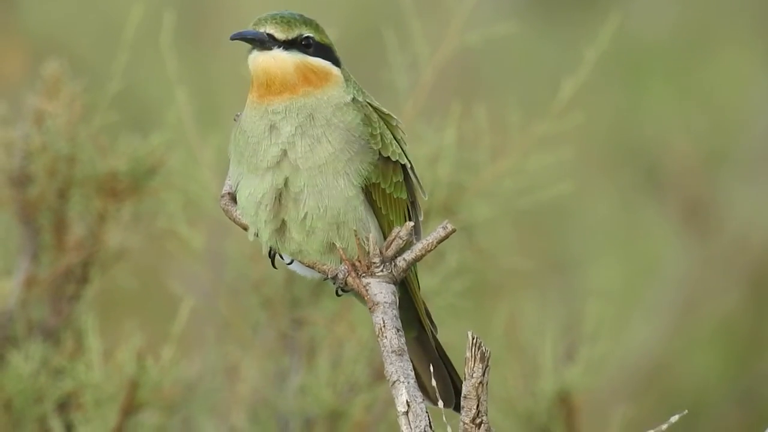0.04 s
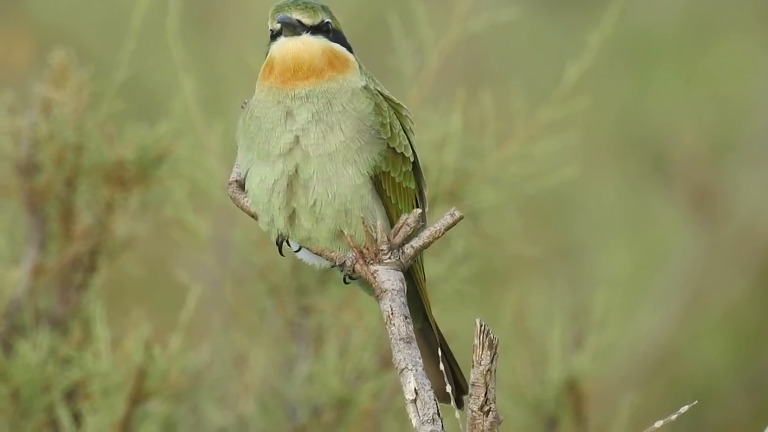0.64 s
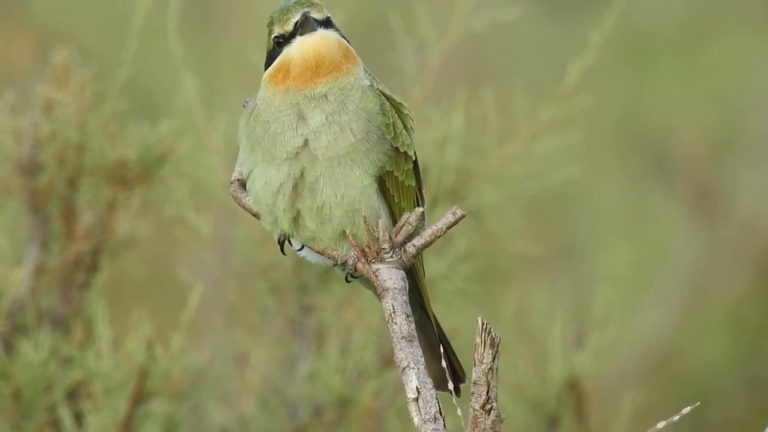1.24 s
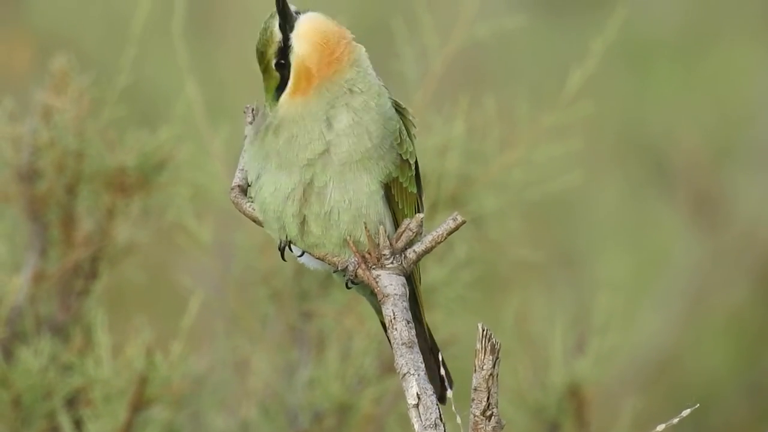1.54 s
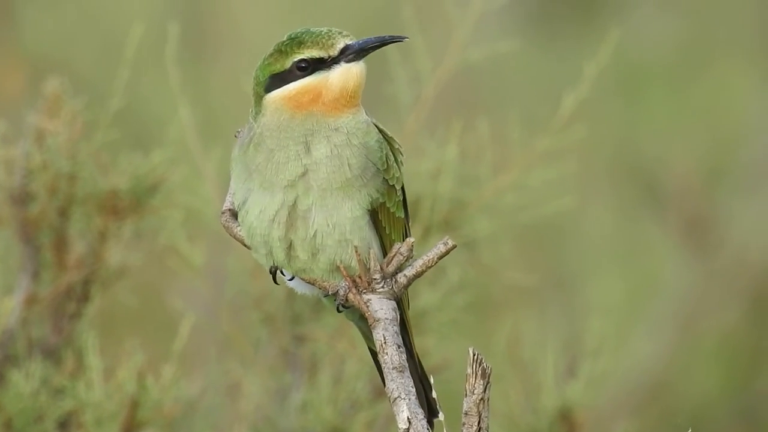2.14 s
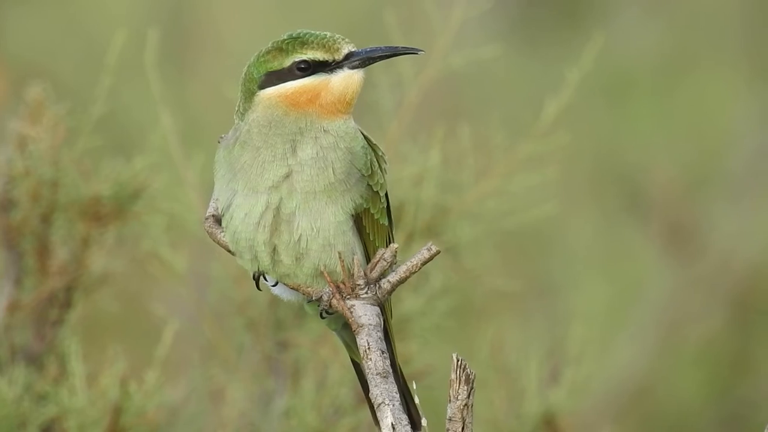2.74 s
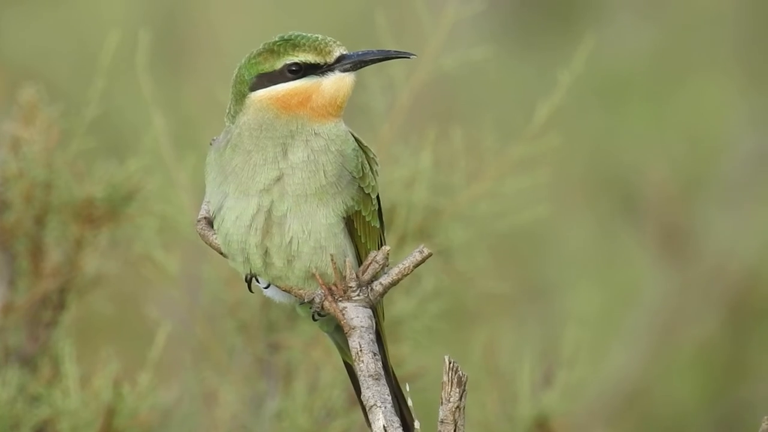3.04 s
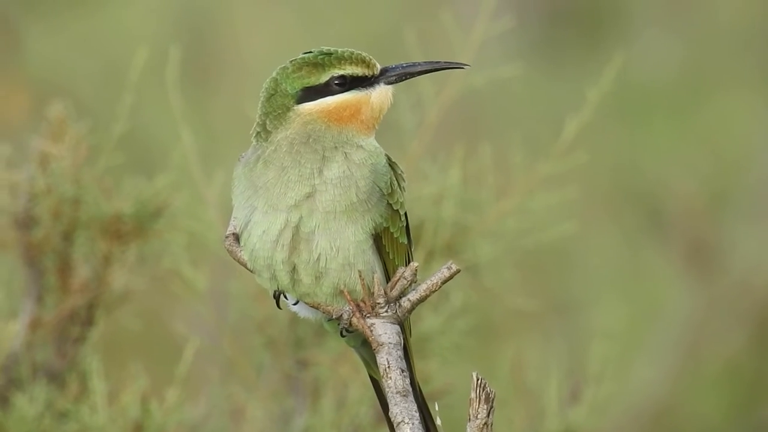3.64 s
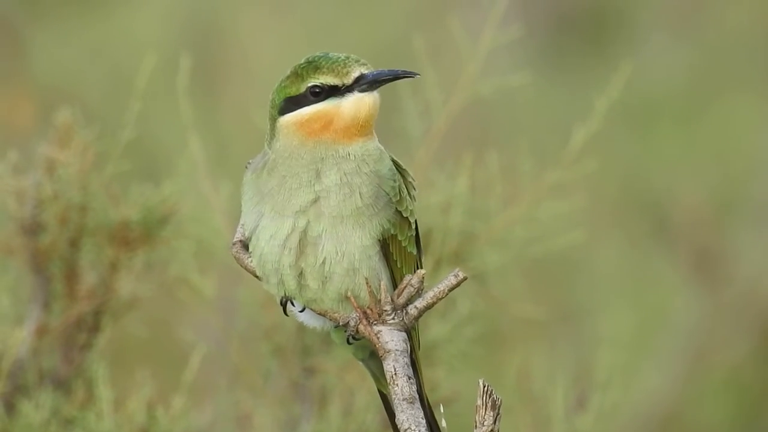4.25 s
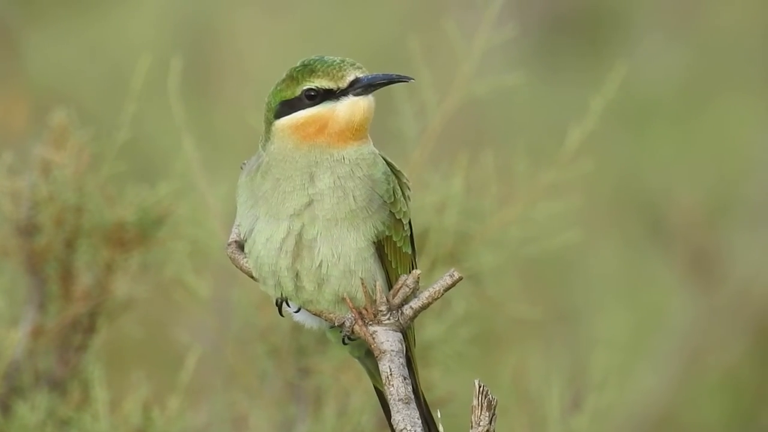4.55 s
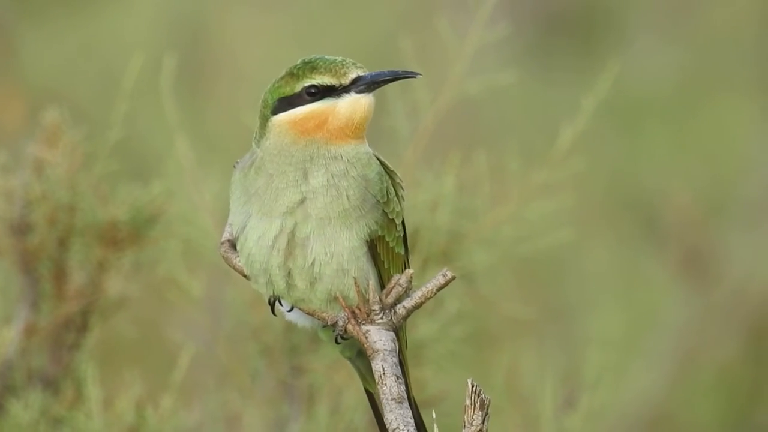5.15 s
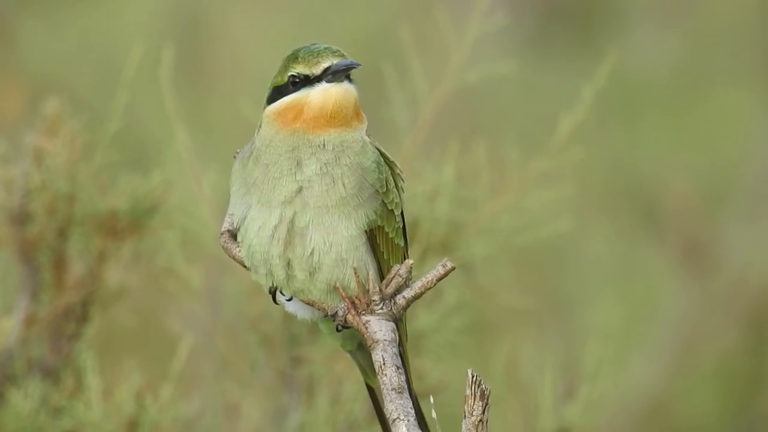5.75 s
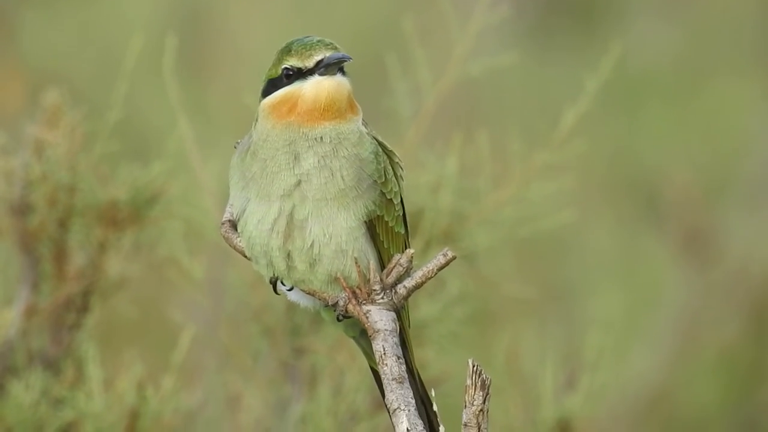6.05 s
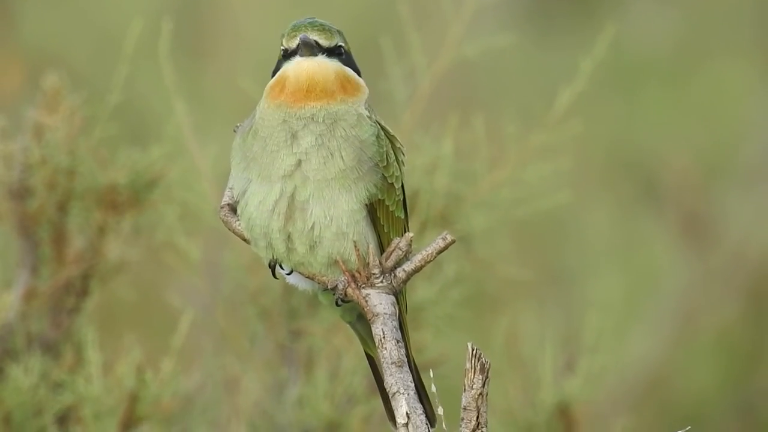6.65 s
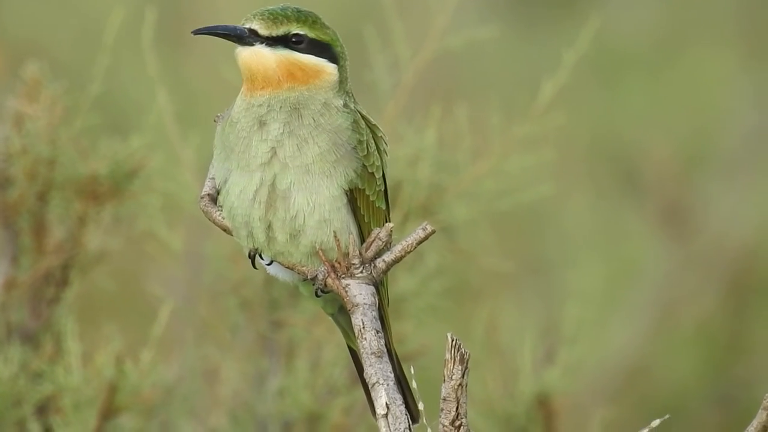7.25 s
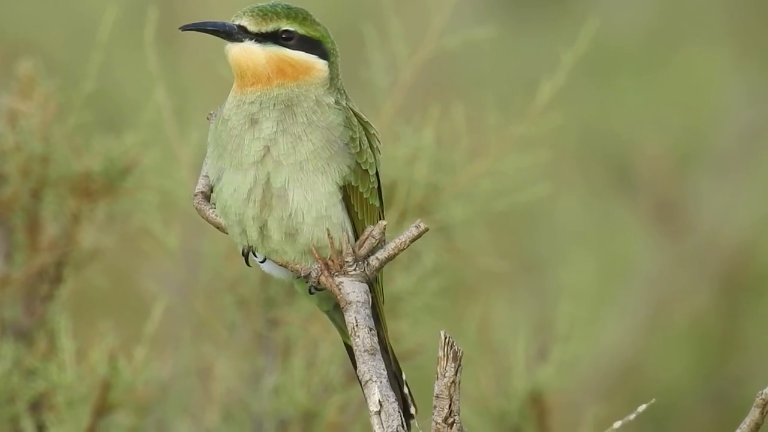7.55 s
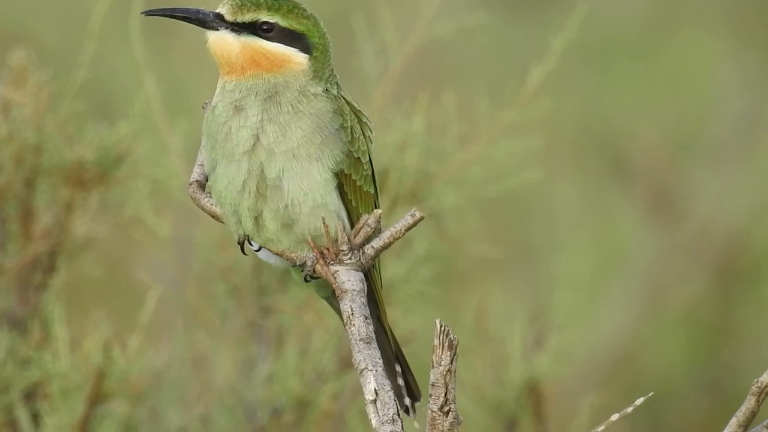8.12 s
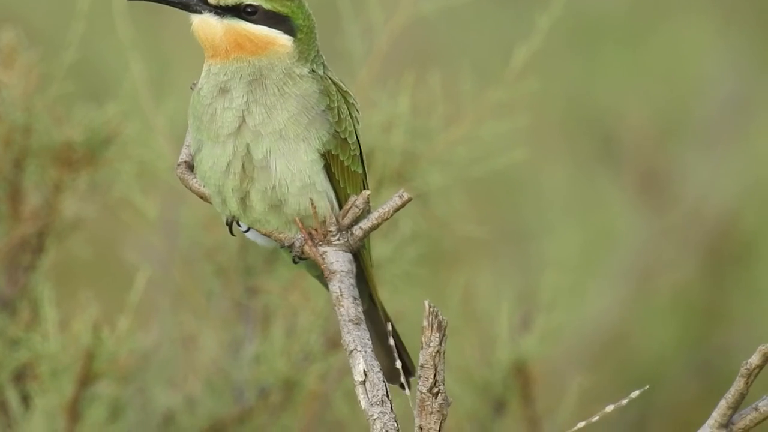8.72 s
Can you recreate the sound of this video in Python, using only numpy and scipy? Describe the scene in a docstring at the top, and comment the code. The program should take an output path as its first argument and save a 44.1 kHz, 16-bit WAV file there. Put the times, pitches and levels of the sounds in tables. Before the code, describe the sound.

Wind puffs and thumps on the microphone in open scrub while crickets chirp steadily and small birds twitter far away.

```python
"""A breeze rumbles on the two microphone ports and swells in short puffs, over the hush of open scrub.
Single eddies thump, and there are short clicks as strong wind overloads the microphone. Crickets chirp
by stridulation, drawing a scraper over a file in short groups of falling pulses near 5 kHz.
A thin buzzing trill of rapid sweeps comes and goes in bouts above them, and small birds
twitter and whistle far off in gliding tones. Ground and bushes scatter the calls into a short tail."""
import sys
import numpy as np
from scipy import signal
from scipy.fft import rfft, irfft, next_fast_len
from scipy.io import wavfile
from scipy.ndimage import uniform_filter1d

SR = 44100
rng = np.random.default_rng(int(sys.argv[2]) if len(sys.argv) > 2 else 0)


def persist_wave(psi):
    """Save psi, clipped to +-1, as 16-bit WAV."""
    counts = np.round(np.clip(psi, -1, 1) * 32767).astype(np.int16)
    wavfile.write(sys.argv[1], SR, np.atleast_2d(counts).T)


N = 387198
TIME = np.arange(N) / SR


def undb(db):
    """Amplitude ratio of a level in decibels."""
    return 10 ** (np.asarray(db) / 20)


def unit(x):
    """Normalisation to an rms of 1."""
    return x / np.sqrt(np.mean(x ** 2))


def add(out, s, sound):
    """Superposition: mix a stereo sound in at s seconds."""
    i = max(int(s * SR), 0)
    part = sound[:, :max(N - i, 0)]
    out[:, i:i + part.shape[1]] += part


def drift(rate_hz):
    """Random modulation of rms 1, interpolated between Gaussian values."""
    knots = rng.standard_normal(int(N / SR * rate_hz) + 2)
    return unit(np.interp(TIME * rate_hz, np.arange(len(knots)), knots))


def noise(spectrum, coherence):
    """Partially coherent coloured noise: coherence is the share common to both ports."""
    hz, db = np.transpose(spectrum)
    size = next_fast_len(N)
    gain = undb(np.interp(np.log(np.fft.rfftfreq(size, 1 / SR) + 1), np.log(hz), db))
    mid, side = irfft(rfft(rng.standard_normal((2, size))) * gain, size)[:, :N]
    return unit(np.sqrt(1 + coherence) * mid + np.sqrt(1 - coherence) * np.array([side, -side]))


def band(x, low_hz, high_hz):
    """Butterworth band-pass with gentle slopes."""
    return signal.sosfilt(signal.butter(2, [low_hz, high_hz], "band", fs=SR, output="sos"), x)


def glide(length_s, pitches, lead, taper, waver):
    """Frequency modulation: an arched tone passes through three pitches; left leads by lead radians."""
    u = np.linspace(0, 1, int(length_s * SR))
    start, middle, end = pitches
    hz = middle + (end - start) * (u - .5) + 2 * (start + end - 2 * middle) * (u - .5) ** 2
    hz *= 1 + waver * np.interp(u, np.linspace(0, 1, 20), rng.standard_normal(20))
    phase = 2 * np.pi * (np.cumsum(hz) / SR + rng.random())
    return np.abs(np.sin(np.pi * u)) ** taper * np.sin([phase + lead, phase])


def bout_times(start, period, repeats):
    """Periodic repetition: the times of the calls in one bout."""
    return start + period * np.arange(repeats)


# The slow breeze. Each row: time in seconds, level in dB.
BREEZE = [(0.0, -34.5), (0.3, -44.5), (0.42, -58), (0.99, -49.3), (1.04, -39), (1.48, -43.5), (2.03, -37.5),
          (2.52, -42.5), (2.69, -31.5), (3.53, -36), (3.57, -43.5), (4.03, -30.5), (4.8, -44),
          (5.23, -34.5), (5.95, -46.5), (6.48, -42), (7.35, -52.0), (8.78, -44.5)]
# Puffs on top of it. Each row: start in seconds, length in seconds, left and right level in dB.
PUFFS = [(0, 0.063, -34, -31.5), (0.118, .15, -43, -38), (0.546, 0.11, -59, -38.5), (0.62, 0.22, -40, -43),
         (0.907, .11, -33.5, -34.5), (1.27, 0.064, -58, -30.5), (1.35, 0.09, -28.5, -55),
         (1.747, 0.23, -37, -33), (2.17, .13, -36, -25.5), (2.463, .12, -39, -32.5),
         (2.773, 0.11, -29, -26.5), (2.947, 0.25, -34.5, -30), (3.342, 0.13, -31, -27.5),
         (3.69, 0.28, -29.5, -28.5), (4.468, 0.12, -37.5, -32.5), (4.599, 0.099, -44, -30.5),
         (5.046, 0.075, -29.5, -30.5), (5.447, 0.048, -46, -33.5), (5.56, .11, -39, -30),
         (5.958, .12, -35, -35), (6.43, 0.34, -38, -39), (7.067, .11, -35, -34.5),
         (7.415, 0.23, -41, -35.5), (7.626, 0.13, -35, -33.5), (7.966, 0.25, -39.5, -34.5),
         (8.25, 0.13, -37, -31), (8.433, 0.055, -39, -29), (8.65, 0.063, -52.5, -35.5)]

def gusts(windward_db=1.5):
    """Wind level in dB at each port: the powers of breeze and arched puffs add, as incoherent sources."""
    tilt_db = windward_db * np.array([[-.5], [.5]])  # the right port faces the wind
    power = undb(np.interp(TIME, *np.transpose(BREEZE)) + tilt_db) ** 2
    for s, length, *ports_db in PUFFS:
        arch = np.sin(np.linspace(0, np.pi, int(length * SR)))
        add(power, s, np.outer(undb(ports_db), arch) ** 2)
    return 10 * np.log10(power)


# Spectrum of the turbulence. Each row: frequency in Hz, relative spectral density in dB.
RUMBLE_SPECTRUM = [(20, -45), (40, -38), (62, -9.5), (85, -15), (110, -3.5), (145, 0.5), (200, -2.5),
                   (300, -12), (450, -23.5), (700, -35), (1200, -40.5), (3000, -55), (9000, -77)]

def wind(gain_db=-1, strong_db=-32, brightening=1.93, rough_db=-18, crackle_db=-27):
    """Turbulent pressure rumbles at each port; strong gusts add smaller, higher eddies and a crackle."""
    gust_db = gusts()
    force = undb(brightening * (gust_db - strong_db))  # 1 in a strong gust
    rumble = unit(noise(RUMBLE_SPECTRUM, coherence=.27) * flicker(depth_db=3, rate_hz=55))
    rough = unit(band(rng.standard_normal((2, N)), 301, 496) * flicker(depth_db=8.5, rate_hz=80))
    impulses_per_s = 16 * force
    impulses = (rng.random((2, N)) < impulses_per_s / SR) * rng.standard_normal((2, N))
    crackle = band(band(impulses, 300, 5300), 300, 5300)
    rumble *= undb(gust_db + gain_db) * flicker(depth_db=2, rate_hz=16)
    return rumble + rough * force * undb(strong_db + rough_db) + crackle * undb(crackle_db)


def flicker(depth_db, rate_hz):
    """Random amplitude modulation, independent at the two ports."""
    return undb(depth_db * np.array([drift(rate_hz), drift(rate_hz)]))


# Spectrum of the hush. Each row: frequency in Hz, relative spectral density in dB.
HUSH_SPECTRUM = [(30, 3), (150, 2), (400, 2), (1000, 1), (1300, -5.5), (1800, -4), (2100, -10.5),
                 (3700, -9), (5000, -5), (5900, -8.5), (6700, -7), (9000, -15), (15500, -24)]

def hush(db=-53, distant_db=-63, sway_db=.05):
    """Ambient noise of open land; a band common to both ports raises the midrange coherence."""
    distant = unit(band(rng.standard_normal(N), 490, 1470))
    diffuse = noise(HUSH_SPECTRUM, coherence=.14)
    return (diffuse * undb(db) + distant * undb(distant_db)) * undb(sway_db * drift(2.35))


def eddy(t, hz, phase_turns, decay_cycles):
    """A passing eddy is a pressure transient: a swing that grows and decays exponentially."""
    return np.exp(-np.abs(t * hz / decay_cycles)) * np.sin(2 * np.pi * (hz * t + phase_turns))


def flurry(gain_db=5, spread_db=6, low_hz=150, high_hz=420, count=110):
    """Local turbulence: small eddies strike the ports in turn, scaled by the wind level there."""
    out, gust_db = np.zeros((2, N)), gusts()
    t = np.arange(-SR // 16, SR // 16) / SR
    for k, (late, pitch, phase, size) in enumerate(rng.random((count, 4))):
        port, i = k % 2, int((k + late) / count * N)
        hz = low_hz * (high_hz / low_hz) ** pitch
        swing = eddy(t, hz, phase, decay_cycles=1) * undb(gust_db[port, i] + gain_db + spread_db * size)
        add(out, i / SR + t[0], np.outer(np.eye(2)[port], swing))
    return out


def twitter(db=-59.7, fade_db_per_s=.65, spread_db=4, hz=2490, spread_hz=260, count=130):
    """Short notes of the farthest birds superpose into a soft chatter that slowly dies down."""
    out = np.zeros((2, N))
    notes = np.c_[rng.random((count, 2)), rng.uniform(-1, 1, (count, 3))]
    for k, (late, length, pitch, slope, size) in enumerate(notes):
        s = (k + late) / count * N / SR
        pitches = hz + spread_hz * pitch + 150 * slope * np.array([1, 0, -1])
        note = glide(.0196 + .0383 * length, pitches, lead=.21, taper=1, waver=.02)
        add(out, s, note * undb(db - fade_db_per_s * s + spread_db * size))
    return out


def chirp(out, s, hz, spacing_s, first_db, db, lead, pulses, stroke_s=.0155, fall_hz=370, rasp=.14):
    """Stridulation: in each wing stroke the scraper slows along the file, so the tone falls."""
    for k in range(pulses):
        stroke = glide(stroke_s, hz + fall_hz * np.array([1, 0, -1]), lead, taper=1.5, waver=.012)
        # the teeth catch unevenly
        teeth = 1 + rasp * unit(uniform_filter1d(rng.standard_normal(stroke.shape), size=24))
        add(out, s + k * spacing_s - stroke_s / 2, stroke * teeth * undb(db + first_db * (k == 0)))


# Four crickets. Each row: carrier in Hz, pulse spacing in seconds, gain of the first pulse in dB,
# level in dB, phase lead of the left port in radians.
CRICKETS = [(5190, .0225, -6, -33, 1.7), (5274, .023, -1, -36, -2.5), (4790, .0215, -1.5, -43.5, 1.9),
            (5030, 0.019, 1, -41.5, 3)]
# The nearest two chirp loosely, about twice a second. Each entry: chirp time in seconds.
FIRST_CRICKET_S = [.064, .506, 1.119, 1.784, 2.312, 2.813, 3.473, 4.065, 4.55, 4.936, 5.545, 6.002, 6.52,
                   6.954, 7.66, 8.259]
SECOND_CRICKET_S = [.33, .768, 1.196, 1.512, 1.943, 2.252, 2.577, 2.969, 3.399, 3.79, 4.216, 4.657, 5.06,
                    5.459, 5.913, 6.38, 6.774, 7.196, 7.609, 7.998, 8.376, 8.556]
# The other two keep time in bouts. Each row: start in seconds, period in seconds, number of chirps.
THIRD_CRICKET_BOUTS = [(.68, .923, 2), (2.226, .535, 6), (6.645, .494, 5)]
FOURTH_CRICKET_BOUTS = [(1.335, .352, 3), (5.25, .809, 2), (7.431, .693, 2)]

def crickets(uneven_db=.4, uneven_hz=25, uneven_rad=.23, far_db=-53.5, far_hz=5060, far_count=230):
    """Phase differences between the ports place four crickets nearby and a distant chorus all round."""
    out = np.zeros((2, N))
    schedules = [FIRST_CRICKET_S, SECOND_CRICKET_S]
    for bouts in (THIRD_CRICKET_BOUTS, FOURTH_CRICKET_BOUTS):
        schedules.append(np.concatenate([bout_times(*bout) for bout in bouts]))
    for (hz, spacing_s, first_db, db, lead), starts in zip(CRICKETS, schedules):
        for s, (pitch, turn, size) in zip(starts, rng.standard_normal((len(starts), 3))):
            chirp(out, s, hz + uneven_hz * pitch, spacing_s, first_db,
                  db + uneven_db * size, lead + uneven_rad * turn, pulses=3)
    for k, (late, side, pitch, size) in enumerate(rng.uniform(-1.1, 1, (far_count, 4))):
        s = (k + late) / far_count * N / SR
        chirp(out, s, far_hz + 360 * pitch, spacing_s=.022, first_db=-2,
              db=far_db + 6 * size, lead=np.pi * side, pulses=2 + k % 2)
    return out


# Bird whistles. Each row: start and length in seconds, first, middle and last pitch in Hz,
# relative level in dB.
WHISTLES = [(0.069, 0.071, 5200, 3960, 3320, -41.5), (0.143, 0.085, 3200, 2955, 2870, -48.5),
            (0.482, 0.11, 4550, 4250, 3820, -58), (0.626, 0.14, 2630, 2843, 2714, -47.5),
            (1.411, 0.068, 3760, 3710, 3540, -49.5), (1.77, 0.1, 2830, 2730, 2500, -54.5),
            (1.789, 0.028, 3280, 3090, 2830, -45.5), (1.89, 0.094, 3800, 3570, 3680, -57),
            (2.028, 0.099, 2880, 3110, 3220, -43), (3.576, 0.048, 2080, 2060, 1880, -55.5),
            (4.13, 0.082, 4750, 3970, 3400, -51.5), (4.624, 0.091, 2620, 3360, 3490, -53),
            (5.785, 0.036, 2910, 3620, 3700, -47.5), (6.133, 0.082, 2610, 2660, 2780, -51),
            (6.265, 0.046, 3270, 2880, 2600, -55), (8.377, 0.086, 5100, 3760, 2998, -53)]

def whistles(gain_db=-1.5):
    """Distant birds whistle nearly pure tones, each modulated in frequency along its own curve."""
    out = np.zeros((2, N))
    for s, length, *pitches, db in WHISTLES:
        note = glide(length, pitches, lead=rng.normal(0, .52), taper=.4, waver=.011)
        add(out, s, note * undb(db + gain_db))
    return out


# Bouts of trills. Each row: start in seconds, period in seconds, number of trills, relative level in dB.
TRILL_BOUTS = [(.08, .27, 2, -60.5), (1.672, 0.26, 2, -60), (2.18, 0.25, 4, -56), (3.735, .11, 2, -59.5),
               (4.22, .25, 4, -65.5), (5.98, 0.22, 2, -62.5), (6.125, 0.24, 4, -58), (7.895, 0.25, 4, -59)]

def trills(length_s=.1, rate_hz=128, sweep_hz=(8150, 7150, 6300), swell_db=6, gain_db=2, jitter_s=.00034):
    """A pulse train of falling sweeps, too quick to hear apart, fuses into a dry, swelling buzz."""
    out = np.zeros((2, N))
    for first, period, repeats, db in TRILL_BOUTS:
        for start in bout_times(first, period, repeats):
            for s in np.arange(start, start + length_s, 1 / rate_hz):
                sweep = unit(glide(.0065, sweep_hz, lead=1.6, taper=.98, waver=.055))
                growth = (s - start) / length_s - .5
                level_db = db + gain_db + swell_db * growth + .58 * rng.standard_normal()
                add(out, s + jitter_s * rng.standard_normal(), sweep * undb(level_db))
    return out


# Single strong eddies. Each row: time in seconds, frequency in Hz, left and right relative level in dB.
EDDIES = [(0.296, 246, -23, -51), (1.096, 340, -43, -18), (1.476, 205, -9, -50), (1.742, 191, -45, -16),
          (1.853, 407, -42, -15), (2.22, 470, -48, -19.5), (2.25, 383, -37, -24.5), (2.766, 450, -38, -14),
          (2.836, 547, -39, -25.5), (2.883, 464, -49, -19), (3.258, 268.3, -43, -9), (3.29, 328, -44, -12),
          (3.386, 146, -19, -24), (3.547, 296, -47, -13.5), (4.036, 340, -44, -17),
          (4.063, 185, -14.5, -14), (5.15, 292, -41, -15.5), (5.375, 377, -47, -20), (5.679, 253, -45, -9),
          (5.731, 210, -35, -10.5), (5.737, 193, -36, -10.5), (5.845, 234, -45, -15),
          (8.142, 380, -48, -23.5)]

def buffets(gain_db=1):
    """A strong eddy swings the pressure once or twice, a transient heard as a thump."""
    out = np.zeros((2, N))
    t = np.arange(-SR // 50, SR // 50) / SR
    for s, hz, *ports_db in EDDIES:
        swing = eddy(t, hz, rng.random(), decay_cycles=.68)
        add(out, s + t[0], np.outer(undb(ports_db) * undb(gain_db), swing))
    return out


# Two-note bird calls. Each row: start in seconds, relative level in dB.
TWO_NOTE_CALLS = [(.455, -49.5), (0.699, -48), (1.463, -50.5), (2.435, -53), (2.68, -53.5), (3.928, -49.5),
                  (4.852, -48.5), (5.351, -48), (5.455, -51), (6.002, -49.5), (6.737, -45.5),
                  (7.395, -49.5), (8.238, -45)]

def two_note_calls(rising_db=-3.5, falling_db=-2, spacing_s=.046):
    """A far bird pairs two opposite frequency sweeps, one rising and one falling."""
    out = np.zeros((2, N))
    for s, db in TWO_NOTE_CALLS:
        rising = glide(.0262, [2450, 2660, 2720], lead=.23, taper=.76, waver=.048)
        falling = glide(.0268, [3000, 2780, 2480], lead=.2, taper=.9, waver=.029)
        add(out, s, rising * undb(db + rising_db))
        add(out, s + spacing_s, falling * undb(db + falling_db))
    return out


# Clicks of microphone overload. Each row: time in seconds, relative level in dB.
OVERLOAD_CLICKS = [(2.7685, -34.5), (2.822, -37), (3.2383, -31), (3.26, -32), (3.3452, -35), (3.984, -34),
                   (4.0597, -33.5), (5.68, -37)]

def overload_clicks(gain_db=5, decay_s=.00054):
    """Short clicks as strong wind overloads the microphone: band-limited pulses, mostly on the right."""
    out = np.zeros((2, N))
    t = np.arange(SR // 25) / SR
    click = np.outer([.5, 1.5], np.exp(-t / decay_s))
    for s, db in OVERLOAD_CLICKS:
        add(out, s, click * undb(db + gain_db))
    return band(band(out, 200, 5400), 200, 5400)


# Faint slurs of a bird deep in the scrub. Each entry: start in seconds.
SLURS_S = [3.26, 6.37, 7.245, 8.595]

def slurs(db=-60, length_s=.085, sweep_hz=(4800, 3350, 2820)):
    """A downward frequency sweep, slow enough to follow, is heard as a slur."""
    out = np.zeros((2, N))
    for s in SLURS_S:
        add(out, s, glide(length_s, sweep_hz, lead=.25, taper=.6, waver=.02) * undb(db))
    return out


def chips(starts_s=(4.7, 6.926, 7.794), db=-51.5, length_s=.024, sweep_hz=(5800, 4630, 4170)):
    """One bird repeats a downward frequency sweep so brief that it is heard as a chip."""
    out = np.zeros((2, N))
    for s in starts_s:
        add(out, s, glide(length_s, sweep_hz, lead=rng.normal(0, .53), taper=.35, waver=.011) * undb(db))
    return out


def scrub(x, wet_db, t60_s):
    """Scattering from ground and bushes adds a diffuse tail that decays exponentially."""
    t = np.arange(SR // 2) / SR
    tail = rng.standard_normal((2, len(t))) * np.exp(-np.log(1000) * t / t60_s)
    tail /= np.sqrt(np.sum(tail ** 2, axis=1, keepdims=True))
    return x + undb(wet_db) * signal.oaconvolve(x, tail, axes=1)[:, :N]


def scene(flutter_db=3):
    """Wind and hush superpose with the animals' calls and their scattered sound."""
    breeze = wind() + flurry() + buffets() + overload_clicks()
    chirping = scrub(crickets(), wet_db=-9, t60_s=.085)
    flutter = undb(flutter_db * drift(150))  # moving air modulates the level of the birds
    birds = (whistles() + two_note_calls() + chips()) * flutter
    song = scrub(twitter() + birds + trills() + slurs(), wet_db=-7.5, t60_s=.19)
    return breeze + hush() + chirping + song


def record(dry, cutoff_hz=15700):
    """Band limiting: a steep elliptic low-pass cuts the highest treble."""
    return signal.sosfilt(signal.ellip(10, .1, 80, cutoff_hz, fs=SR, output="sos"), dry)


dry = scene()
out = record(dry)
persist_wave(out)
```